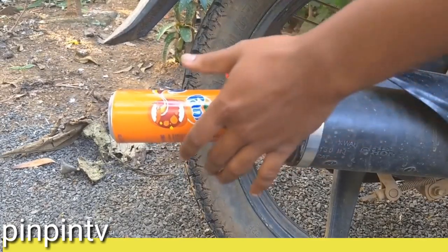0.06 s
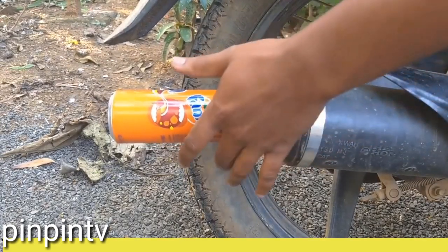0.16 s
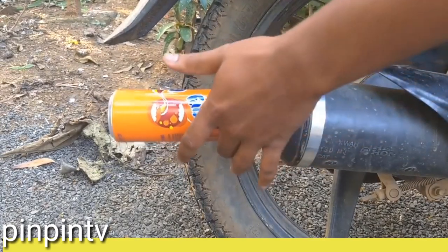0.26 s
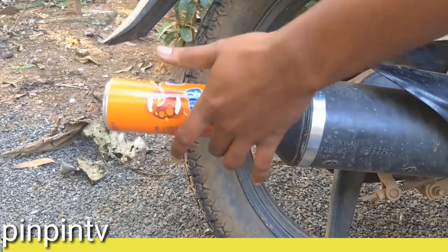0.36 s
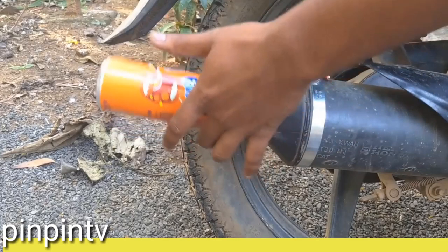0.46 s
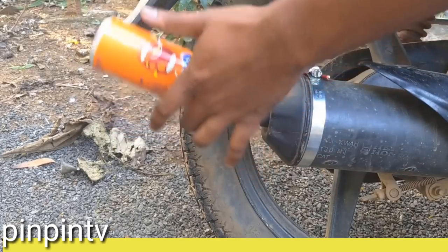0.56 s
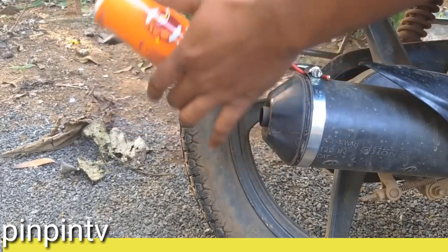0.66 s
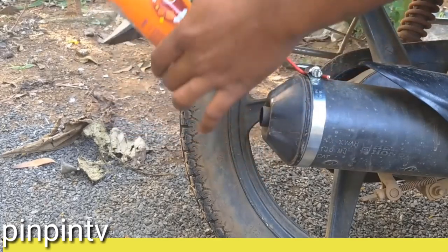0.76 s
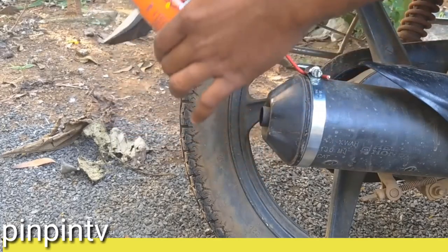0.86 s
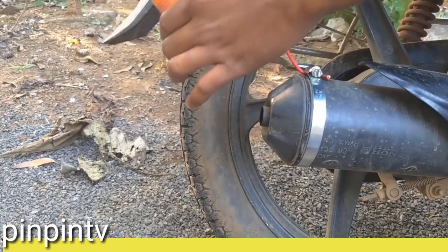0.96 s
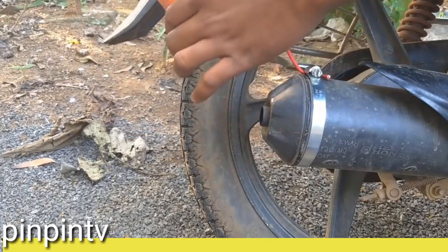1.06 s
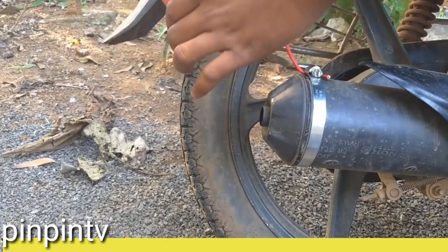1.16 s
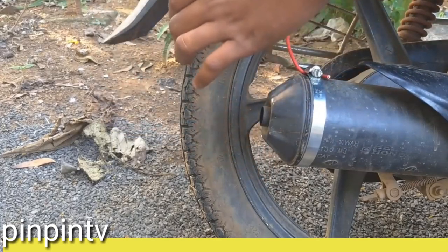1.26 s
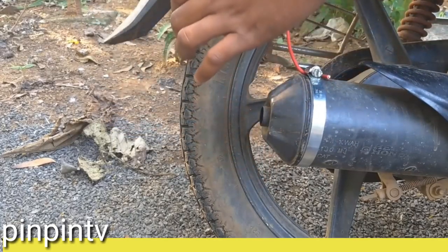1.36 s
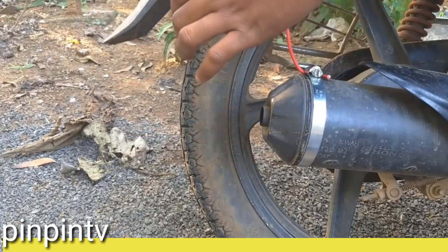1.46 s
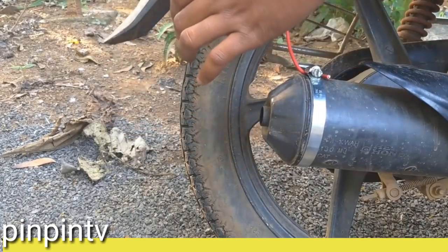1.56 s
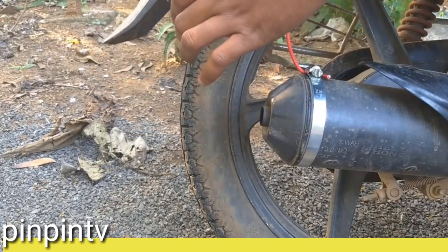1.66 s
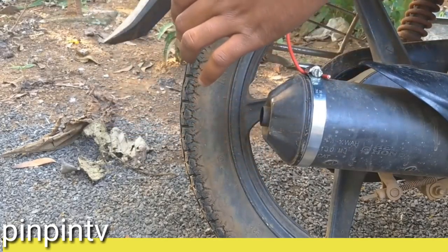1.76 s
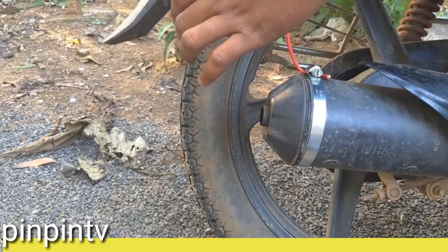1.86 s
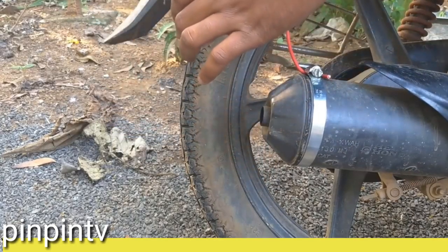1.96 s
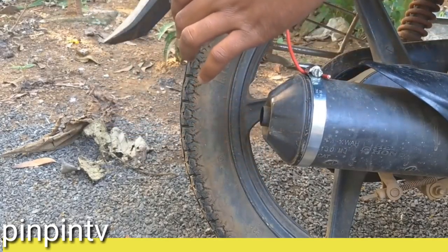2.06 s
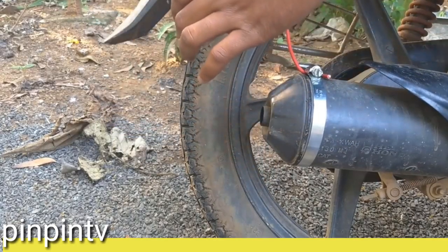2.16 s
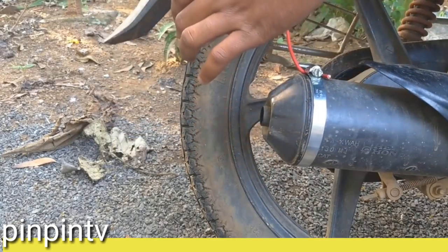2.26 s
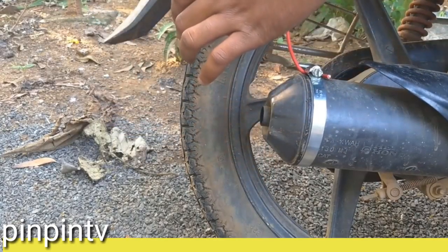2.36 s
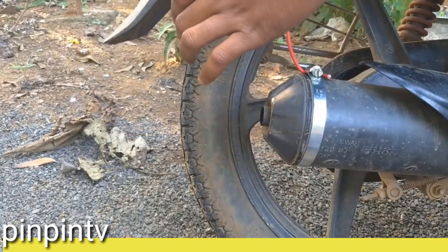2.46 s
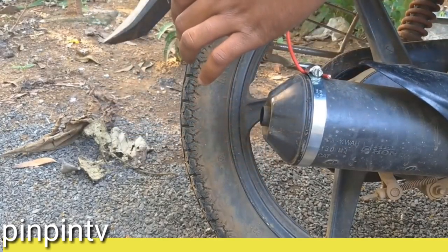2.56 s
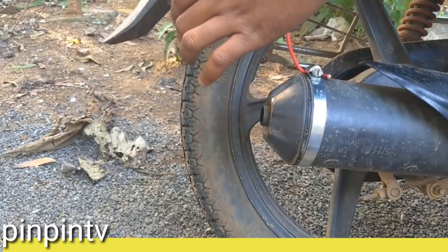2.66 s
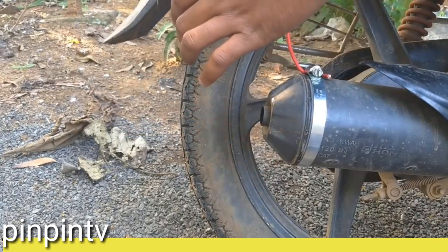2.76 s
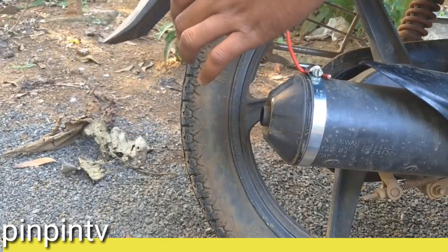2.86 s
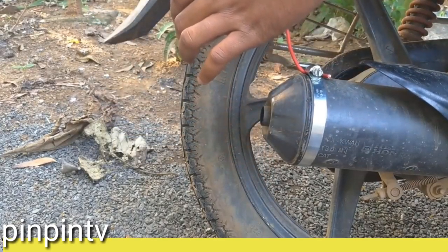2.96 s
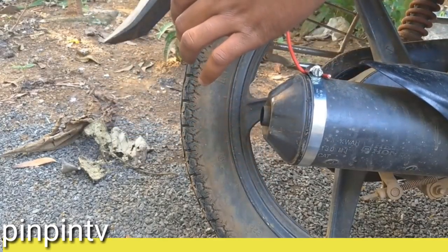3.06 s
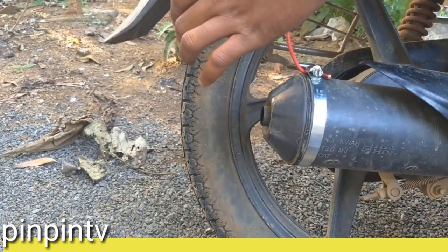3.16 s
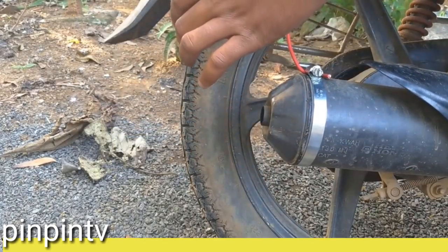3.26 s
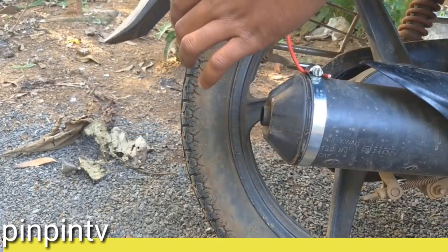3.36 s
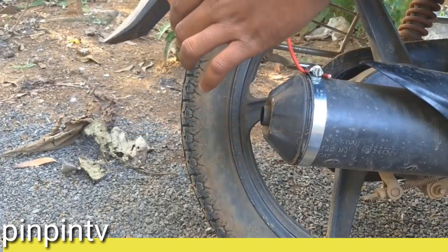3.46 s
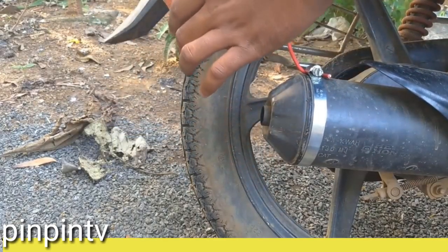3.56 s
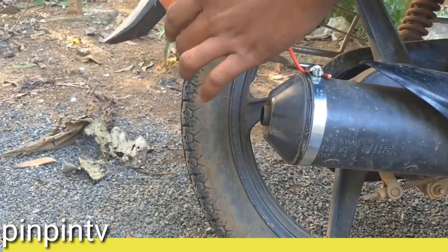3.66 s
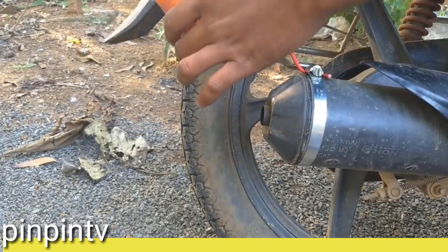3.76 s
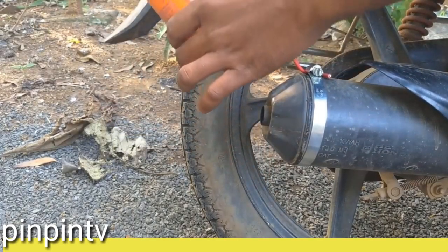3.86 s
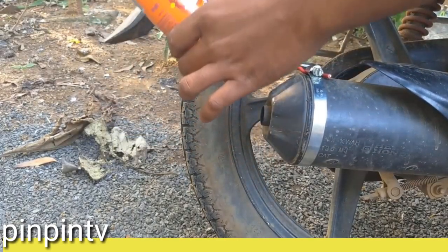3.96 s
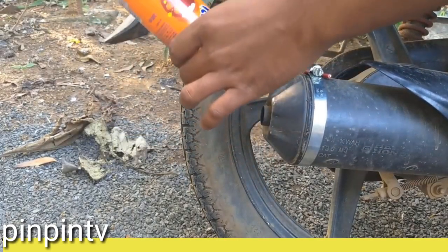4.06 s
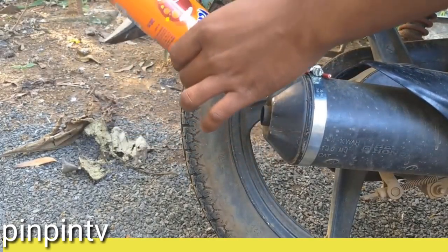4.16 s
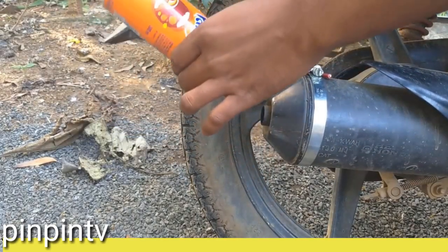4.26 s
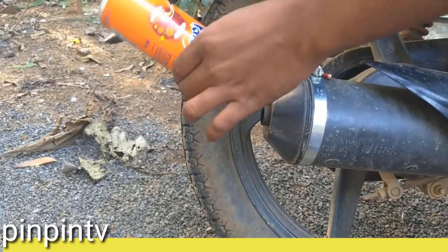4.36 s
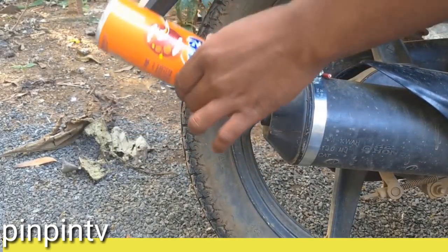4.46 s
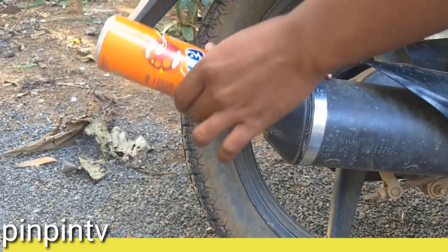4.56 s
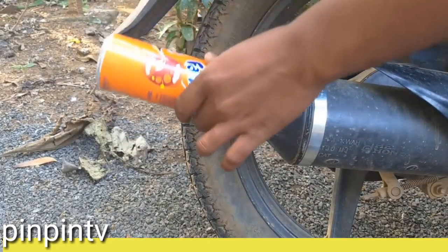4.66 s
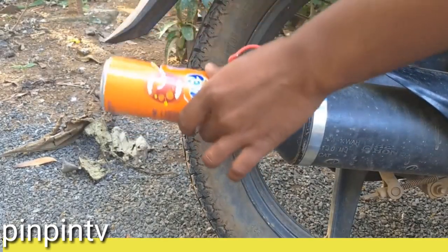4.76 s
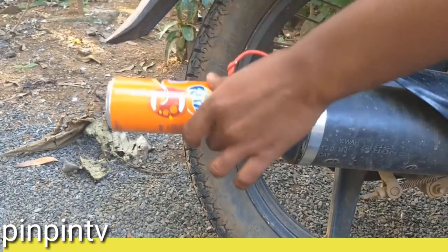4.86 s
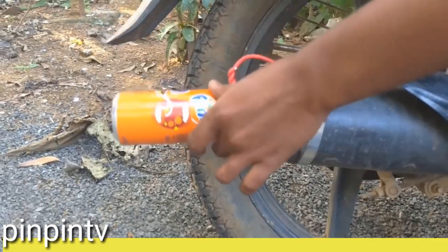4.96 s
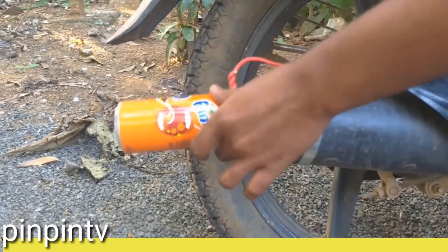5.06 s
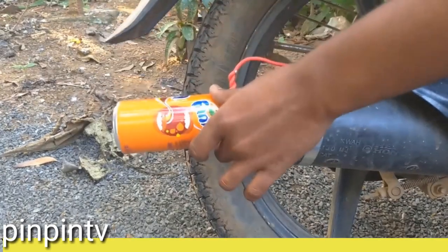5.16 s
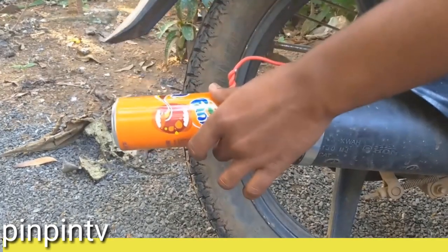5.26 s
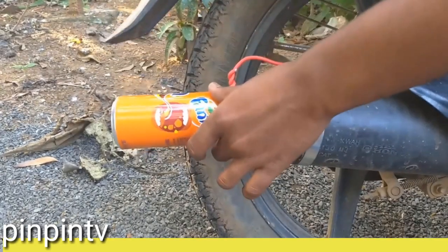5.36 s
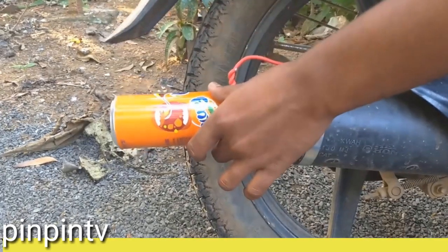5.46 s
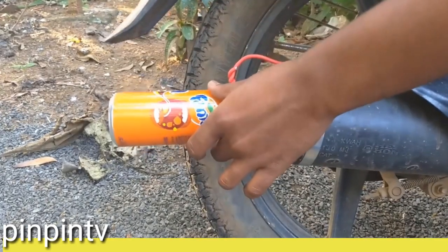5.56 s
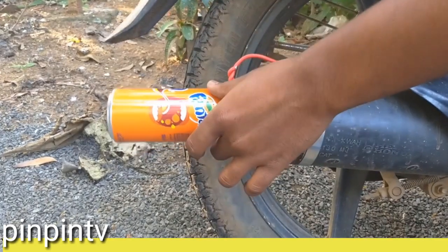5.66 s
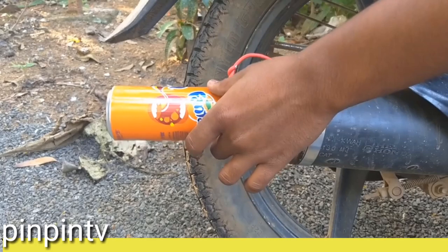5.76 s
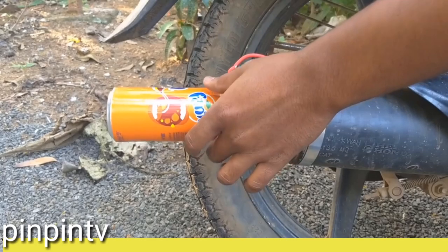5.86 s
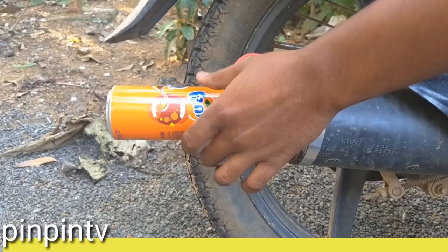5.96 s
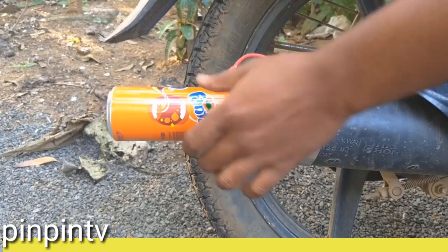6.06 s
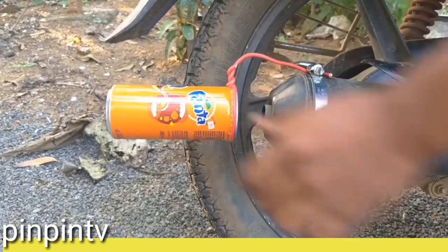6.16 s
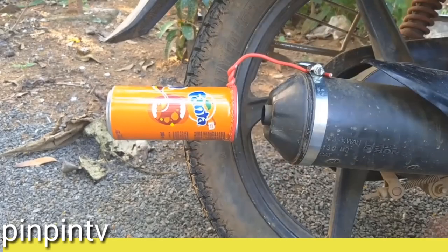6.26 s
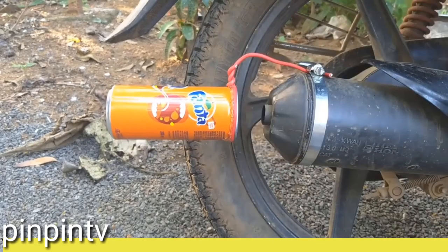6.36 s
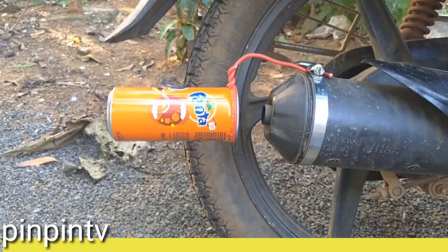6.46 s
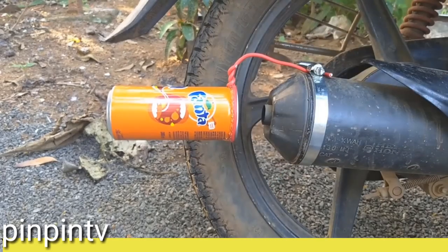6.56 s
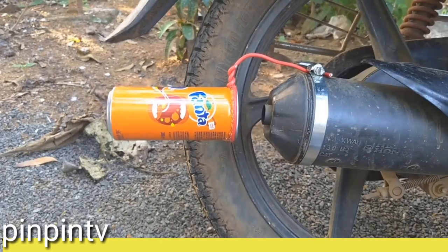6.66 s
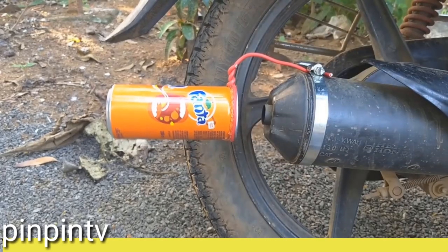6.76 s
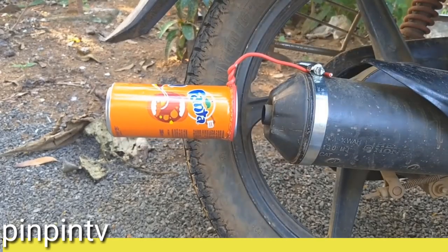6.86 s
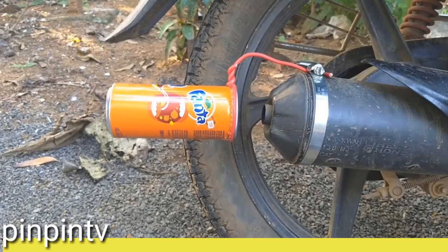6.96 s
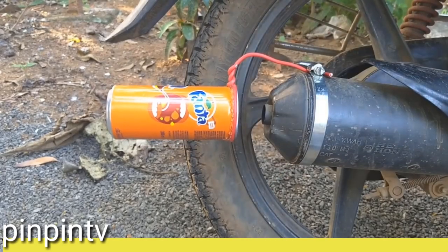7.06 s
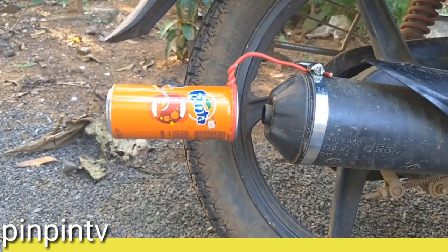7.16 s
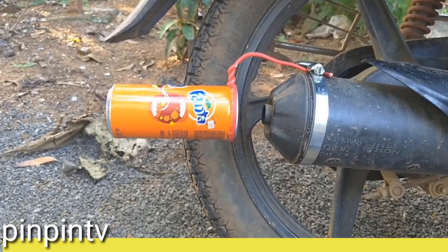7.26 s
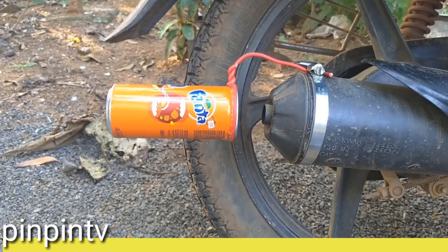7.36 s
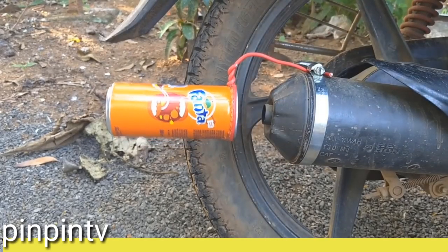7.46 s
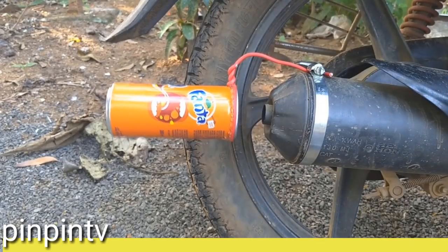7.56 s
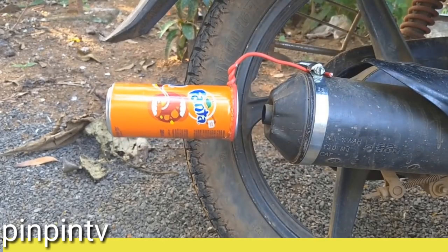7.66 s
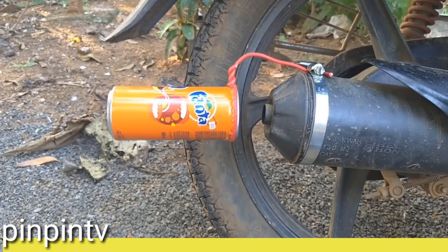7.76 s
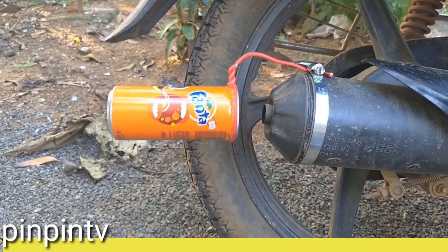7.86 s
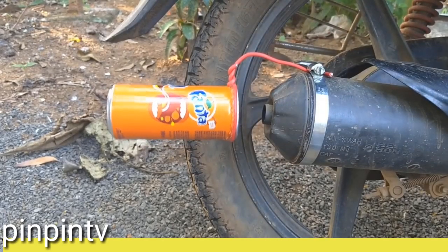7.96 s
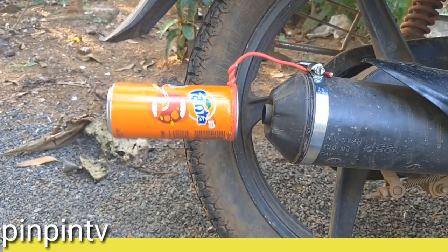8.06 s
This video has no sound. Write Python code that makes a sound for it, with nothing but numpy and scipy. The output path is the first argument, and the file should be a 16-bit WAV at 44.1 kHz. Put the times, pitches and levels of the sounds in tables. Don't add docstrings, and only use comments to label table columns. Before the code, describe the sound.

A small single-cylinder motorcycle putters outdoors, each puff honking hollowly through a metal can, then barks openly through three throttle blips before the hollow popping returns.

```python
import sys
import numpy as np
from scipy import signal
from scipy.fft import rfft, irfft
from scipy.io import wavfile

SR = 44100
rng = np.random.default_rng(int(sys.argv[2]) if len(sys.argv) > 2 else 0)


def digitize_waveform(pressure):
    field = np.atleast_2d(pressure).T
    bounded = np.clip(field, -1, 1)
    quanta = np.round(bounded * 32767).astype(np.int16)
    wavfile.write(sys.argv[1], SR, quanta)


def elevation(decibels):
    levels = np.asarray(decibels, float)
    return 10 ** (levels / 20)


N = 357210
TIME = np.arange(N) / SR
AROUND = np.arange(-400, 5000) / SR
AWAY_FROM_S, AWAY_TO_S = 1.0, 4.1
RING_MS = 4.8

# stroke_number, gap_ms
STUMBLE = [(0, 61.63), (6, 91.33), (7, 87.72), (10, 55.26), (18, 37.34), (25, 40.60)]
# stroke_number, gap_ms
BLIPS = [(32, 30.25), (42, 45.10), (54, 30.22), (62, 27.97), (75, 41.53), (88, 26.92), (101, 40.23),
         (110, 65.17)]
# stroke_number, gap_ms
SETTLE = [(117, 83.67), (129, 66.88), (145, 64.60), (150, 36.92), (161, 54.94), (166, 35.07), (167, 39.29),
          (171, 42.23)]
# start_s, end_s
UNLIT_SPANS = [(0, .2), (.3, .36), (.81, 1), (1.12, 1.15), (1.2, 1.23), (1.28, 1.3), (1.36, 1.38),
               (1.63, 2.0), (2.67, 3.07), (3.57, 4.56), (4.63, 4.78), (7.17, 7.57), (7.84, 8.1)]
# time_s, burnt_share
WEAK_FIRINGS = [
    (.184, 0.45),
    (4.527, .5),
    (4.743, 0.74),
]
# time_s, late_ms (minus is
WANDER = [(0, 0.7), (.3, 2), (.5, 2.2), (.83, 1.5), (1, 2.2), (1.1, .5), (1.4, 1.5), (1.48, 1.8),
          (1.62, -0.7), (1.66, 1.4), (1.85, 1.5), (1.97, 0.5), (2.02, -.8), (2.15, 1.5), (2.35, -0.5),
          (2.52, 1.7), (2.66, 0.5), (2.73, 1.1), (2.87, 1), (3.05, 2.5), (3.13, -1), (3.4, -0.4),
          (3.55, 0.7), (3.6, 2.6), (3.85, 1), (3.97, 0.5), (4.39, 2), (4.45, 0.5), (5, 0), (5.3, 2),
          (5.8, 1.7), (6.15, 1.1), (6.8, 1), (7, 4), (7.5, -1), (7.6, -0.5), (7.8, 2), (7.9, 2), (8.1, -1)]
# time_s, burnt_ring_db, unlit_ring_peak_ms, rush_on_rim_db
REACH = [(0, -6, 10, 7.5), (.2, -9.5, 9, 7.5), (.5, -8.5, 7, 3), (.84, -6, 6.5, 1.5),
         (.98, -17.5, 6.3, 1.5), (4.12, -22, 9, 3), (4.3, -10.5, 14.5, 6.5), (4.5, -13, 11, 7.5),
         (4.85, -6.5, 7, 3), (6.3, -9.5, 7, 3), (7.1, -6, 6, -0.5), (7.5, -7.5, 7.2, 3.5),
         (7.75, -9, 6.5, -3), (8.1, -8, 5.5, 0)]
# time_s, thump_db, ring_db, ring_peak_ms
ODD_STROKES = [(.246, 4, -1, 5.5), (.33, 2, 15.5, 31), (.409, 3, -0.5, 4.24), (.587, -3, -1.5, 3.8),
               (.661, 4, -2.5, 7), (.725, 2, -8, 6.9), (.781, 2.5, -3.5, 6), (4.223, 0.5, -7, 8.9),
               (4.333, -1.5, -3, 17), (4.457, 2.5, 2.5, 5.3), (4.528, 3, -3, 10.6), (4.672, -16, -7.5, 10),
               (4.819, -0.5, -4, 3.6), (4.898, -3, 0.5, 5.6), (5.3, 0, -2.5, 5.1), (6.133, -2.5, -3, 4.8),
               (5.45, 4.5, -0.5, 3.8), (5.737, 0.5, 3, 4.25), (5.937, -2, 2.5, 5.05), (6.07, -2.5, 1, 5.1),
               (6.268, -2, 1.5, 4.4), (6.397, -1, 3.5, 5.1), (6.53, -1, 4.5, 5), (6.857, -3, 3.8, 3.5),
               (7.024, -1, 0, 5.6), (7.07, -5, -0.5, 4), (4.59, 1.5, 1, 4.25), (4.75, 2.5, 0, 11),
               (.94, 0.5, -0.5, 5.1), (6.464, -3, -2, 4.9), (6.919, -3, -2.5, 1.26), (6.973, -1, 0.5, 4.2),
               (7.15, -5, -1, 5.8), (7.187, -8, -6.5, 7.2), (7.229, -1, 2.5, 6.1), (7.31, -1, -5.5, 5.53),
               (7.547, -2, -4.5, 7.7), (7.593, -5.5, -2, 2.9), (7.65, -7, -0.5, 1.48), (7.742, -5, 1.5, 4),
               (7.822, -4.5, -5.5, 5.9), (7.859, -9, -8.5, 6.56)]
# time_s, late_ms, ring_db
UNEVEN = [(.05, 0.5, -0.3), (.183, 0, .3), (.503, -1.5, 2), (.89, -4.5, 1.8), (5.668, 0.5, .3),
          (6.728, -0.5, 1.1), (7.27, -1, -2.5), (7.7, -0.5, 1.2), (7.785, -0.5, 1.3), (7.9, 1.5, 0),
          (.116, 0.5, 0.5), (.343, -3.5, 1.5), (.592, -2, 1.5), (.664, -1.8, 1.5), (.728, -1.5, -1.5),
          (.787, 1.5, 0.5), (.841, -1, 0), (4.406, 1, 0.5), (4.461, -3.5, 1.5), (4.746, -2.5, -2),
          (4.822, 1.5, 1), (4.903, -0.5, -6.5), (4.984, -1.5, -2), (5.066, -3, -0.5), (5.145, -3, -2),
          (5.225, -2.5, 0), (5.381, 0, -2), (5.454, 1, 0), (5.528, 0.5, 0), (5.6, 2.1, -1),
          (5.739, -0.5, -4), (5.805, -1.5, 1), (5.872, -0.5, 0), (6.005, -1.5, 1.5), (6.071, -1.4, 0),
          (6.206, 0.5, 1.5), (6.337, -0.5, -0.5), (6.532, -1, -3), (6.598, -0.8, -1), (6.663, -0.5, -1.5),
          (6.796, 1.5, 1), (6.861, 1.5, -5.5), (6.922, -2, 0.5), (6.977, -3, -3), (7.027, -2.5, -1),
          (7.072, -0.8, 0), (7.114, -1.5, -2), (7.153, 1.5, -5), (7.197, 0.8, 3), (7.358, -1, -0.5),
          (7.403, -1, 1), (7.453, -0.8, 0.5), (7.499, 0, 1), (7.554, 0.5, 0), (7.825, -2.5, 3.5),
          (7.943, -1.5, 0), (7.984, -1, -2), (8.025, 0, -2)]
# pitch_hz, level_db, decay_to_60db_s
CAN_MODES = [
    (559.7, 0, 0.08),
    (630, 2.5, 0.0092),
    (413, -9, 0.024),
    (1770, -8, 0.021),
    (1066, -7, 0.011),
]
# time_s, share_of_decay
GRIP = [(0, 1.53), (.25, 0.53), (.4, 0.97), (.8, 1.39), (1, 0.87), (4.2, 0.96), (8.1, 1.256)]
# time_s, level_db
BRIGHT_STROKES = [(.048, 14.5), (.11, 14), (.18, 17.5), (.33, 6), (.587, -3), (.661, 14.5), (.725, 17),
                  (.84, 9.5), (4.457, 7), (4.59, -6), (4.75, 16), (4.819, -2), (5.87, -5), (5.937, -17),
                  (6.856, -0.5), (6.919, -6.5), (6.973, 0), (7.023, 8), (7.069, -0.5), (7.11, 2),
                  (7.593, 6.5), (7.65, -5), (7.7, 5), (7.742, -2.5), (7.783, 3), (7.822, 8)]
# pitch_hz, level_against_thump_db, decay_to_60db_s
PIPE_MODES = [
    (439.3, -12.5, 0.082),
    (1027, -53.5, 0.025),
]
# pitch_hz, level_db_per_hz
RUSH = [(40, 15.5), (150, 6), (400, -4), (1000, -3.5), (2000, -11), (3500, -6.5), (5200, -14), (7000, -17),
        (11000, -23), (16000, -24)]
# pitch_hz, width_hz, level_against_rush_db
CASING = [(998, 16, -0.5), (1318, 25, 3.5), (1740, 73, 3.5), (1960, 39, 6.5), (2176, 46, 10.5),
          (2336, 29, 18), (2465, 46, 8.5), (2653, 46, 10.5), (2967, 150, 4.5), (3390, 8, -7), (3780, 20, 7),
          (4212, 49, 4), (4320, 32, -7), (4440, 130, 3.5),
          (4855, 48, 9), (5200, 41, 6.5), (6030, 60, 0.5), (6750, 180, 2), (7730, 20, -28), (8600, 22, -55),
        (9450, 190, 4.5), (9900, 70, -16), (9800, 130, -0.5), (10340, 88, 1.5), (10600, 67, -23),
        (11400, 80, -19), (12100, 90, -5), (15137, 90, -17)]
# time_s, rush_db
THROTTLE = [(1, -0.5), (1.4, 1), (1.5, 1.5), (1.56, -0.5), (1.65, -3), (1.9, -0.5), (2.2, 2), (2.35, -0.5),
            (2.6, 1), (2.68, 0.5), (2.72, -4), (3.0, -3), (3.2, 0.5), (3.4, -1), (3.56, -2), (3.62, -3),
            (3.9, -2), (4.1, -0.5)]
# time_s, level_db, pitch_hz
WHISTLE = [(4.15, -65, 1357), (4.24, -51, 1540), (4.31, -36, 1770), (4.38, -37, 1790), (4.45, -28, 1770),
           (4.52, -31, 1790), (4.6, -46, 1840)]
# times_per_exhaust_stroke, level_at_14_strokes_per_s_db
SHAKE = [(1, -33), (2, -36), (3, -45.5)]


def rms_one(x):
    return x / np.sqrt(np.mean(x ** 2) + 1e-20)


def in_time(rows, s):
    at, *columns = np.transpose(rows)
    return [np.interp(s, at, column) for column in columns]


def nearest(times, at):
    return np.argmin(abs(times - at))


def late(x, count):
    return np.concatenate([np.zeros(count), x[:-count]])


def filtered(x, order, hz, kind="low"):
    return signal.sosfilt(signal.butter(order, hz, kind, fs=SR, output="sos"), x)


def filtered_in_step(x, order, hz, kind="low"):
    return signal.sosfiltfilt(signal.butter(order, hz, kind, fs=SR, output="sos"), x)


def resonance(x, hz, width_hz):
    r = np.exp(-np.pi * width_hz / SR)
    feedback = [1, -2 * r * np.cos(2 * np.pi * hz / SR), r * r]
    return signal.lfilter([(1 - r * r) / 2, 0, (r * r - 1) / 2], feedback, x)


def lay(times, shapes):
    index = np.round(times * SR).astype(int)[:, None] + np.round(AROUND * SR).astype(int)
    index = np.where((index < 0) | (index > N), N, index)
    return np.bincount(index.ravel(), shapes.ravel(), N + 1)[:N]


def crank():
    turn, ms = np.transpose(STUMBLE + BLIPS + SETTLE)
    gap = 1 / np.interp(np.arange(turn[-1] + 1), turn, 1000 / ms)
    first_s = .03796
    return first_s + np.cumsum(gap) - gap[0], gap


def rate(s):
    at, gap = crank()
    return np.interp(s, at, 1 / gap)


def can_away(s):
    return (s > AWAY_FROM_S) & (s < AWAY_TO_S)


def unlit(s):
    return sum((s > start) & (s < end) for start, end in UNLIT_SPANS)


def strokes():
    s, gap = crank()
    lit = 1 - unlit(s)
    free = can_away(s)
    s = s + (1 - lit) * np.where(free, 4.3, 4.02) / 1000
    chance = rng.standard_normal((len(s), 2))
    ring_db, cold_ms, _ = in_time(REACH, s)

    change = np.diff(lit, prepend=0)
    shrink_ms = np.maximum(-1000 * np.diff(gap, prepend=gap[0]), 0)
    thump_db = -19.5 + 0.3006 / gap - 0.66 * lit * shrink_ms
    thump_db += (-0.27 - 2 * (1 - lit)) * ~free
    thump_db += free * (-3.5 * (change > 0) + 2 * (change < 0))
    thump_db += .4 * chance[:, 0]
    ring_db += -5 * (1 - lit) + .5 * chance[:, 1]
    ms = np.where(lit, RING_MS, cold_ms)

    for at, odd_thump_db, odd_ring_db, odd_ms in ODD_STROKES:
        k = nearest(s, at)
        thump_db[k] += odd_thump_db
        ring_db[k] += odd_ring_db
        ms[k] = odd_ms
    s = s - .8 * lit * ~free * (ms - 4.4) / 1000
    for at, ms_late, db in UNEVEN:
        k = nearest(s + ms / 1000, at)
        s[k] += ms_late / 1000
        ring_db[k] += db

    prompt = np.clip((6.3 - ms) / 2.2, 0, 1)
    can_db = np.where(free, -120, ring_db)
    return s, thump_db, can_db, np.where(free, 2, ms) / 1000, np.where(free, lit, prompt)


def thumps(s, db, burnt):
    speed = rate(s)
    free = can_away(s)
    chance = rng.standard_normal((len(s), 2))
    burnt_hz = (105.3 + 2.27 * speed) * np.where(free, 0.95, 1)
    cold_hz = (84 + 1.51 * speed) * np.where(free, 1, 0.833)
    burnt_ms, cold_ms = 24.6 - 0.48 * speed, 10.9 - 0.13 * speed
    hz = (cold_hz + burnt * (burnt_hz - cold_hz))[:, None]
    hz = hz * (1 + .006 * chance[:, :1])
    length = (cold_ms + burnt * (burnt_ms - cold_ms))[:, None] / 1000
    cold_share = np.where(free, 1, 1 - (1 - 0.46) * (1 - burnt))[:, None]
    slow_cold = ((1 - burnt) * np.maximum(25 - speed, 0))[:, None]
    chamber = (np.where(free, 0.11, 0.31) * (1 - burnt) - 0.018 * burnt)[:, None]
    kick = .55 * (burnt * np.where(free, 1, .5))[:, None]
    burnt = burnt[:, None]
    length = length * (1 + .12 * burnt + .03 * chance[:, 1:])

    lead = .62 - 0.28 * burnt
    t = AROUND + 1.2 / 1000 * (1 - burnt)
    after_s = np.maximum(AROUND, 0)
    rise = np.exp(-(np.minimum(t, 0) * hz / lead) ** 2)
    fall = np.exp(-(np.maximum(t, 0) / length) ** (2 + 1.2 * burnt))
    fall = fall * np.exp(-burnt * after_s / 0.18)
    after = .11 * np.exp(-after_s / .035) * (1 + 0.77 * slow_cold) * cold_share

    phase = 2 * np.pi * hz * AROUND * (1.05 - 6.3 * burnt * np.clip(AROUND, 0, .03))
    shape = -(np.cos(phase) + 0.12 * burnt * np.sin(2 * phase)) * rise * (fall + after)
    shape -= chamber * np.cos(2 * np.pi * 1.867 * hz * AROUND) * np.exp(-((AROUND - .001) / 0.019) ** 2)
    kick_ms = 1000 * AROUND + .6
    shape -= kick * np.exp(-(np.minimum(kick_ms, 0) / .9) ** 2 - np.maximum(kick_ms, 0) / 1.6)
    return lay(s, elevation(db - 3.0)[:, None] * shape)


def rings(s, db, peak_s, modes, upper_db):
    peak = peak_s[:, None]
    t = np.maximum(AROUND - 0.29 * peak, 0)
    swell = 1 - np.exp(-(t / (0.5 * peak + 1e-4)) ** 2)
    swell *= np.exp(-(t / 0.083) ** 3)
    grip = in_time(GRIP, s)[0][:, None]
    shapes = 0
    for k, (hz, mode_db, t60) in enumerate(modes):
        chance = rng.standard_normal((len(s), 3))
        extra_db = (k > 0) * (upper_db + 2.2 * chance[:, 0])
        level = elevation(db + mode_db + extra_db)[:, None]
        phase = 2 * np.pi * hz * (1 + 0.0074 * chance[:, 1:2]) * (AROUND - peak)
        decay = elevation(-60 * t / (t60 * grip * (1 + 0.011 * chance[:, 2:])))
        shapes = shapes + level * decay * swell * np.cos(phase)
    return lay(s, shapes)


def suction(s, can_db, peak_s, burnt):
    dip = np.exp(-(1000 * AROUND / 1.3) ** 2)
    return -lay(s + 0.22 * peak_s, (burnt * elevation(can_db - 13))[:, None] * dip)


def cracks(s, db, rough):
    width = .0004 * (1 + .1 * rng.standard_normal((len(s), 1)))
    grit = 2.7 * rng.standard_normal((len(s), len(AROUND)))
    grit *= np.exp(-np.maximum(AROUND / 0.0017, -AROUND / 0.0018))
    snap = -2.5 * AROUND / width * np.exp(-(AROUND / width) ** 2)
    snap = snap + rough[:, None] * grit
    return filtered(lay(s, elevation(db)[:, None] * snap), 2, [300, 2400], "band")


def flicker(per_s):
    noise = rng.standard_normal(N // 40 + 2001)
    slow = signal.sosfilt(signal.butter(2, per_s, fs=SR / 40, output="sos"), noise)[2000:]
    return elevation(0.95 * np.interp(np.arange(N) / 40, np.arange(len(slow)), rms_one(slow)))


def casing_noise():
    ticks = (rng.random(N) < 1500 / SR) * elevation(3.5 * np.minimum(rng.exponential(1, N), 4))
    raw = rng.standard_normal((2, N)) * (1 + 0.23 * signal.lfilter([1], [1, -.9], ticks))
    body = raw + sum(elevation(db) * resonance(raw, hz, width) for hz, width, db in CASING)
    hz = np.arange(N // 2 + 1) * SR / N + 1
    rush_hz, rush_db = np.transpose(RUSH)
    colour = elevation(np.interp(np.log(hz), np.log(rush_hz), rush_db))
    return rms_one(irfft(rfft(body) * colour, N))


def clatter(s, burnt):
    speed = rate(TIME)
    throttle_db = in_time(THROTTLE, TIME)[0]
    level_db = -58 + 0.6938 * speed + in_time(REACH, TIME)[2] + throttle_db
    order = np.argsort(s)
    level_db = level_db + 1.9 * np.interp(TIME, s[order] + 0.0029, burnt[order] - 1)

    t = AROUND - .004
    puff = np.exp(-np.maximum(t, 0) / 0.011) * np.exp(-(np.minimum(t, 0) / 0.0065) ** 2)
    chance = elevation(2.0 * rng.standard_normal((len(s), 2)))
    puffs = lay(s, (chance[:, 0] * (1 - 0.058 * burnt))[:, None] * puff)
    seat_s = np.sort(s)[1:] - 0.23 * np.diff(np.sort(s))
    seating = lay(seat_s, chance[1:, 1:] * np.exp(-(AROUND / 0.0019) ** 2))

    body = casing_noise()
    mids = filtered_in_step(body, 2, 1700)
    upper = filtered_in_step(body, 2, 3300, "high")
    mid_gain = elevation(-0.2131 * (speed - 17.5))
    body = mids * mid_gain * flicker(18.0) + (body - mids - upper) * flicker(22.0) + upper
    top = filtered(body, 2, 5500, "high")
    hiss = elevation(-3 - 0.04 * throttle_db) * (1 + 2.19 * puffs + 0.63 * seating)
    rattle = (body - top) * flicker(24.8) * (1 + 0.76 * puffs + 0.16 * seating)
    return elevation(level_db + 13.0) * (rattle + hiss * top * flicker(28.0))


def whistle():
    db, hz = in_time(WHISTLE, TIME)
    waver = rms_one(filtered(rng.standard_normal((2, N)), 2, 30))
    phase = 2 * np.pi * np.cumsum(hz + 9 * waver[1]) / SR
    return elevation(db + 1.4 * waver[0]) * np.sin(phase)


def shake():
    at = crank()[0]
    turn = np.interp(TIME, np.r_[-.02, at, 8.11], np.arange(len(at) + 2))
    tones = sum(elevation(db) * np.cos(2 * np.pi * round(order) * turn) for order, db in SHAKE)
    return elevation(-0.48 * (rate(TIME) - 14)) * tones


def rumble():
    draws = rng.standard_normal((2, N))
    both = np.array([draws[0], 0.97 * draws[0] + .15 * draws[1]])
    return elevation(-49) * rms_one(filtered(both, 2, [25, 150], "band"))


def scene():
    s, thump_db, can_db, peak_s, burnt = strokes()
    free = can_db < -100
    leaving = (s > .81) & (s < 1.0)
    wander = in_time(WANDER, s)[0] / 1000
    s = s + free * wander
    fired = np.where(free, burnt, 1.0 - unlit(s))
    for at, share in WEAK_FIRINGS:
        fired[nearest(s, at)] = share
    thump_s = s + ~free * wander - 0.0011 * leaving + 1.65 / 1000 * burnt * ~free
    thump = thumps(thump_s, thump_db, np.maximum(fired, leaving)) + shake()

    upper_db = 8 * (burnt - 1)
    for at, db in BRIGHT_STROKES:
        upper_db[nearest(s, at)] += db
    exhaust = whistle() + suction(s, can_db, peak_s, burnt)
    exhaust += rings(np.r_[s, -.02], np.r_[can_db + 3, -8], np.r_[peak_s, .006],
                     CAN_MODES, np.r_[upper_db, -8])
    exhaust += rings(s, thump_db - 14 * (1 - burnt) - 40 * ~free, peak_s, PIPE_MODES, 0)
    shock_db = can_db - 13.5 + 2 * np.maximum(RING_MS - 1000 * peak_s, 0)
    crack_db = np.maximum(shock_db, thump_db - 26.0) - 12 * (1 - burnt)
    exhaust += cracks(s + 0.694 * peak_s, crack_db, np.where(free, 0.14, 1))

    noise = filtered(clatter(s, burnt), 2, 260, "high")
    low = filtered_in_step(noise, 3, 1550)
    back = .885 * late(exhaust, count=5)
    back += 0.86 * late(thump, count=6)
    back += .92 * late(low[0], count=1)
    back += elevation(-4) * (noise[1] - low[1])
    back += elevation(-0.5) * low[1]
    return np.array([exhaust + thump + noise[0], back]) + rumble()


def low_pass(x):
    return signal.sosfilt(signal.butter(12, 15570, fs=SR, output="sos"), x)


def record(dry):
    other = dry[::-1]
    opposite = .975 * other - .09 * filtered(other, 2, 1100, "high")
    opposite -= 0.2 * resonance(other, 1910, 900)
    opposite -= .13 * filtered_in_step(other, 2, 5600, "high")
    beams = dry - np.array([late(port, count=19) for port in opposite])
    zero, pole = np.exp(-2 * np.pi * 700 / SR), np.exp(-2 * np.pi * 45 / SR)
    beams = elevation(-8.0) * signal.lfilter([1, -zero], [1, -pole], beams)
    beams = filtered(beams, 4, 52, "high")
    ceiling = .78
    beams = beams / (1 + (np.abs(beams) / ceiling) ** 4) ** .25
    beams = signal.sosfilt(signal.cheby2(28, 60, 15690, fs=SR, output="sos"), beams)
    return low_pass(beams)


dry = scene()
out = record(dry)
digitize_waveform(out)
```